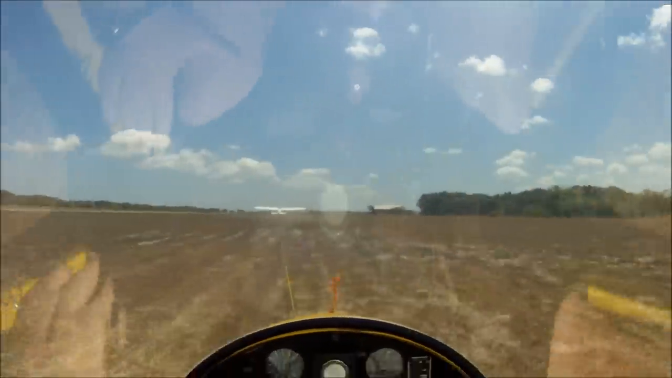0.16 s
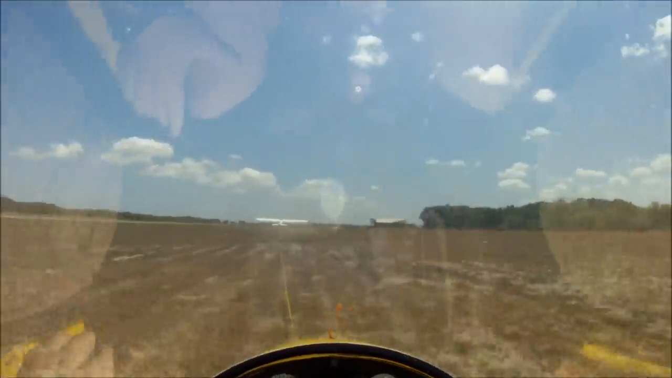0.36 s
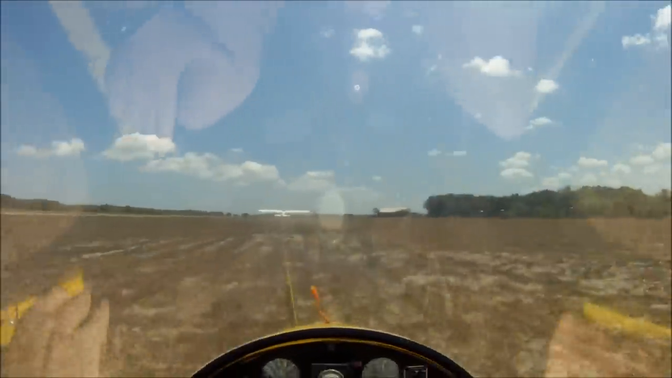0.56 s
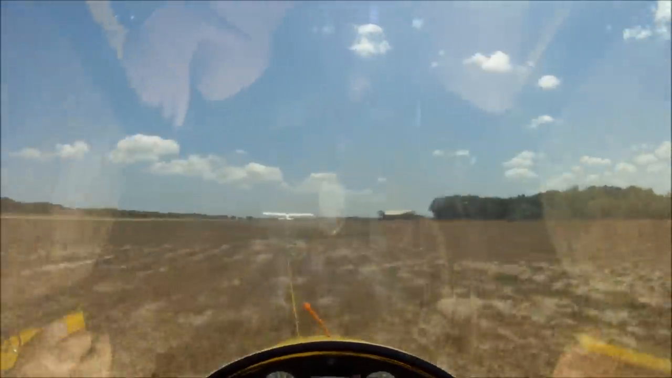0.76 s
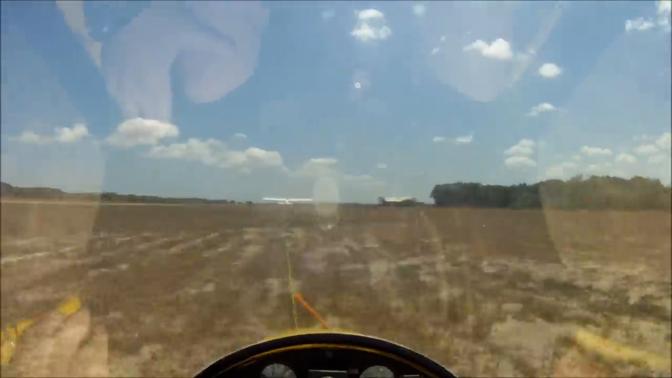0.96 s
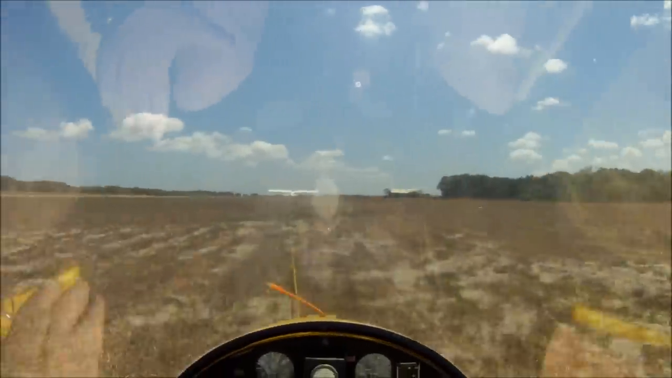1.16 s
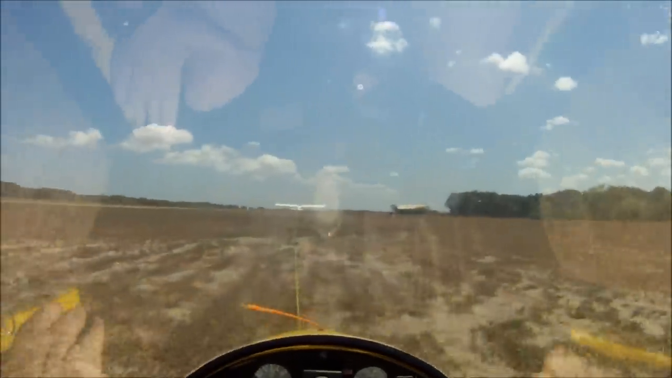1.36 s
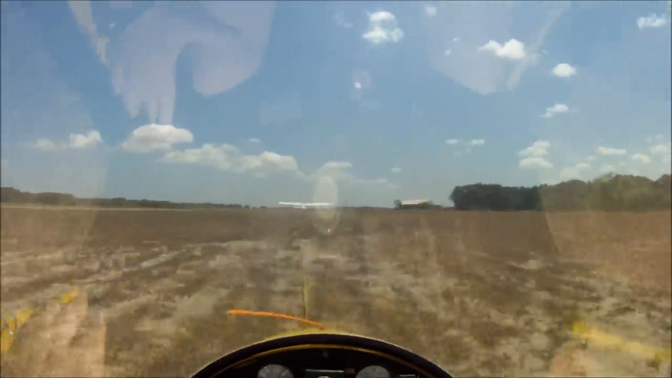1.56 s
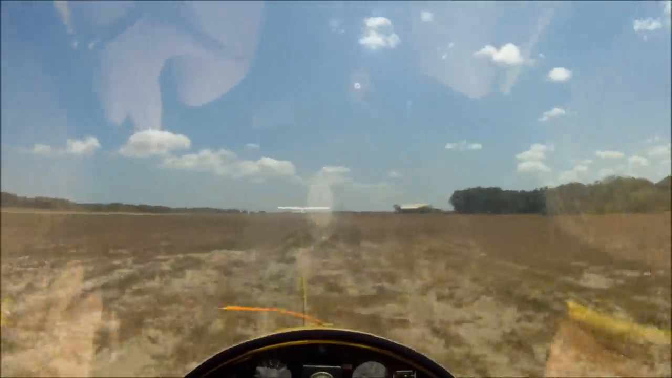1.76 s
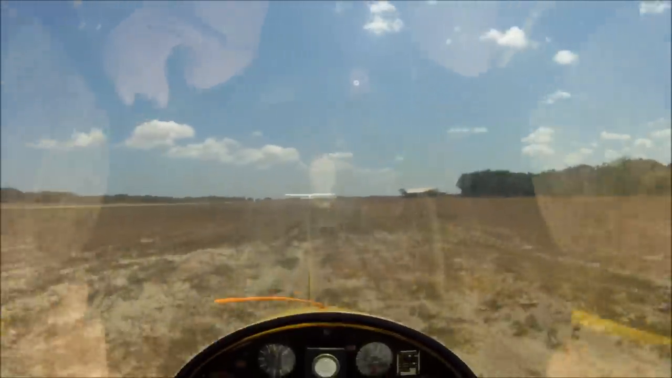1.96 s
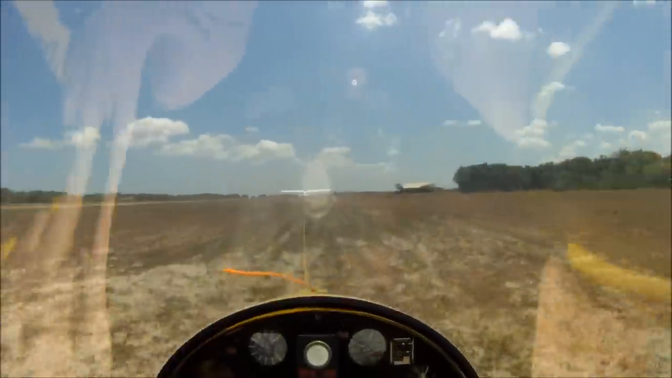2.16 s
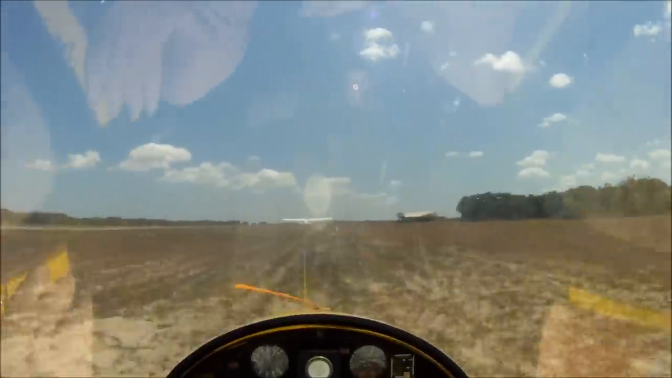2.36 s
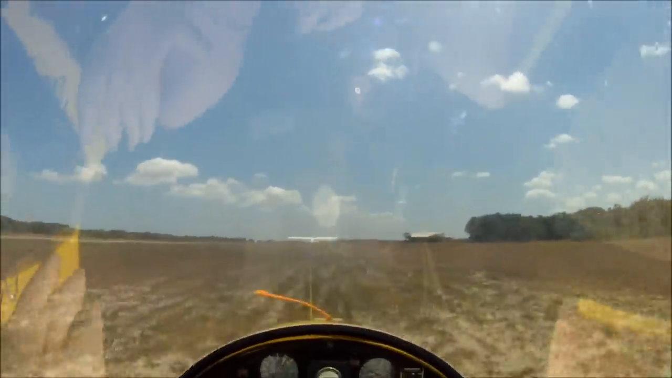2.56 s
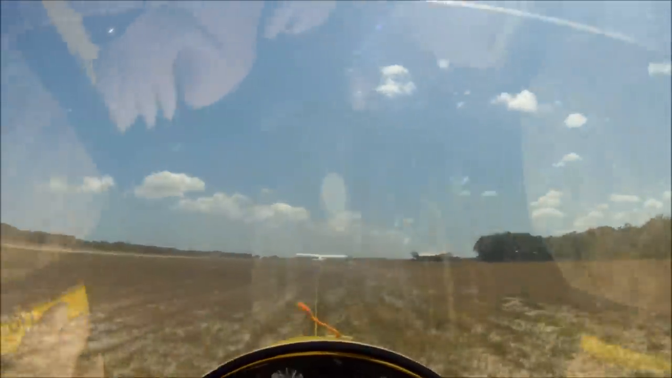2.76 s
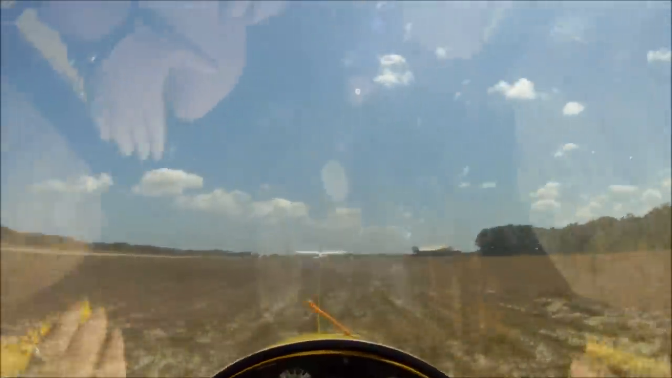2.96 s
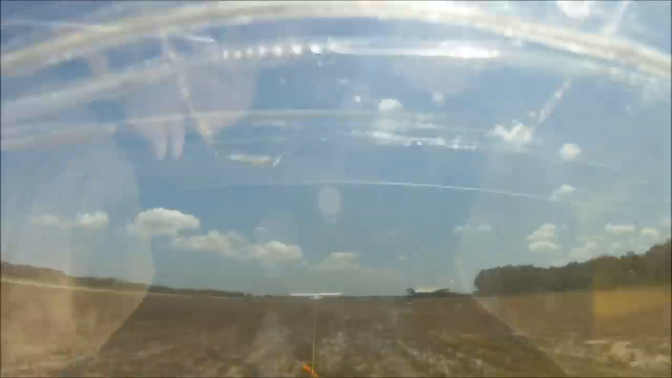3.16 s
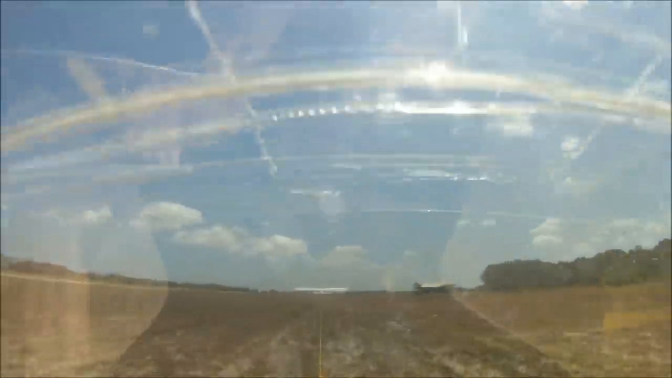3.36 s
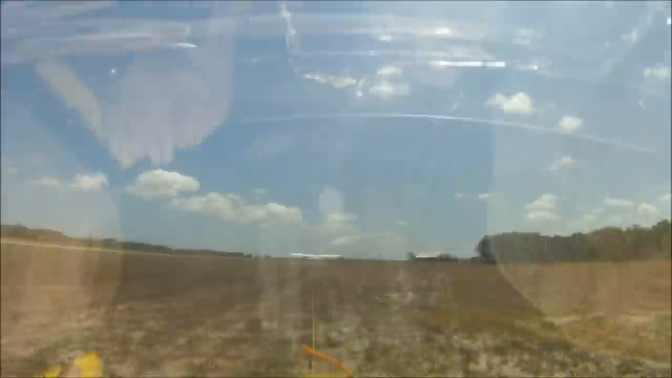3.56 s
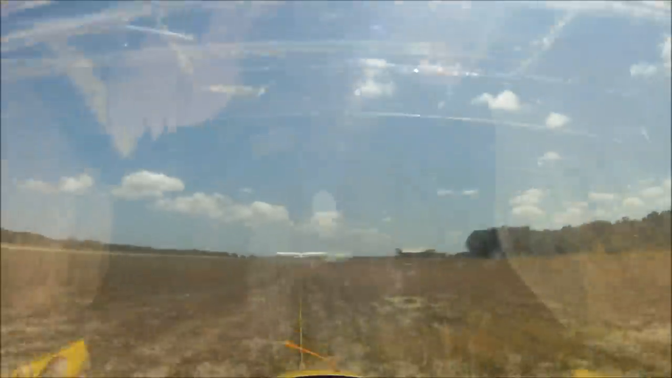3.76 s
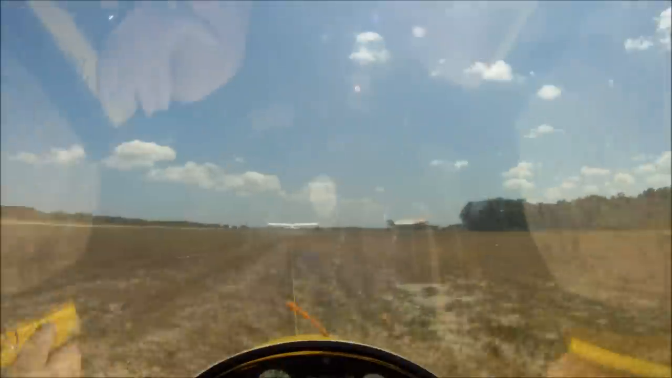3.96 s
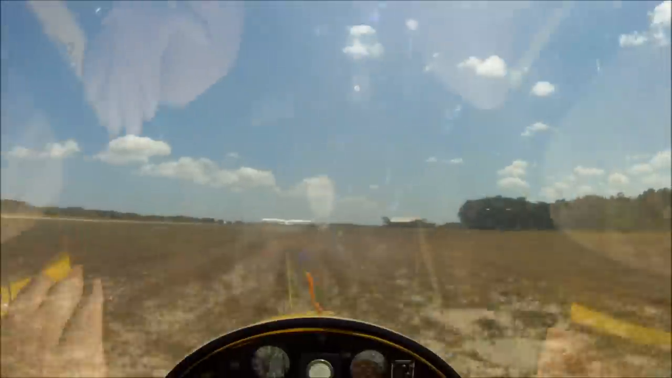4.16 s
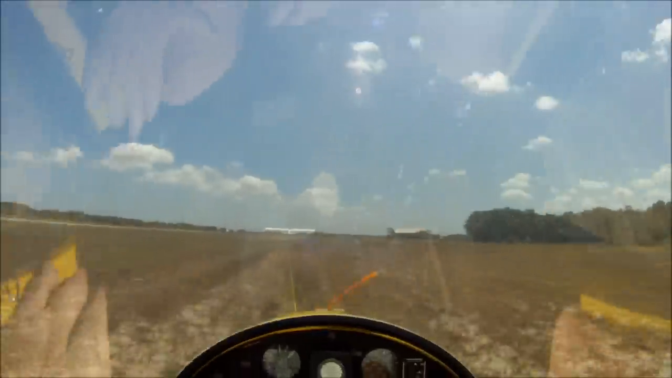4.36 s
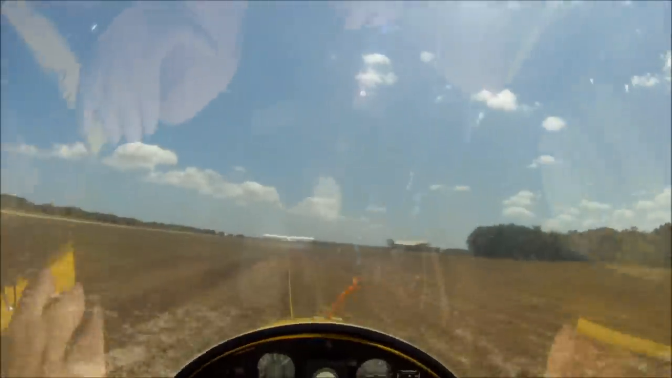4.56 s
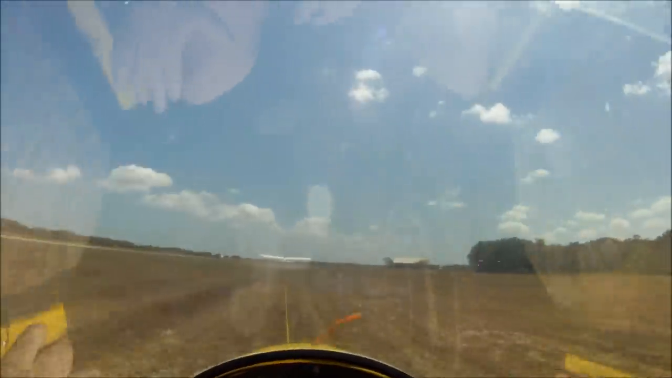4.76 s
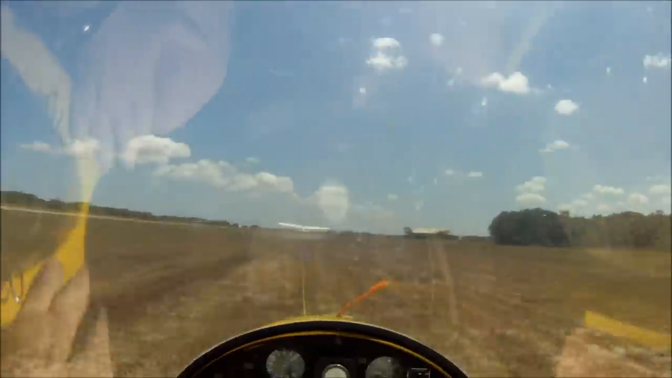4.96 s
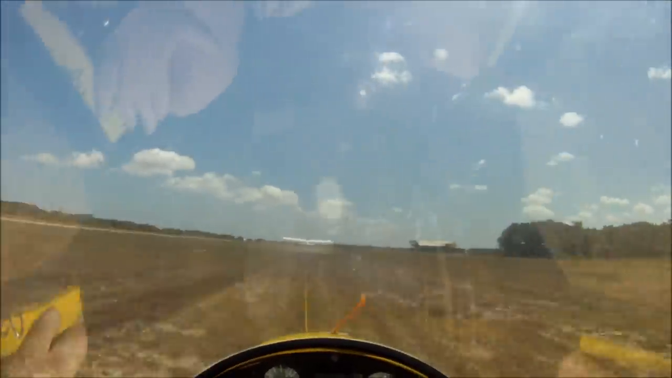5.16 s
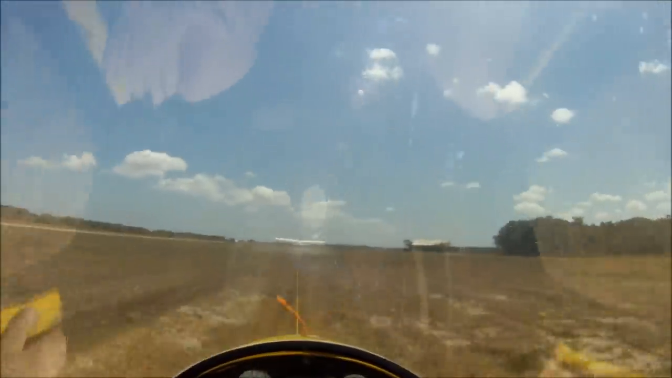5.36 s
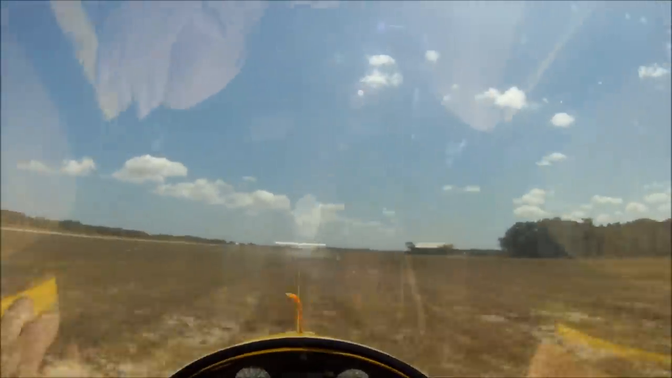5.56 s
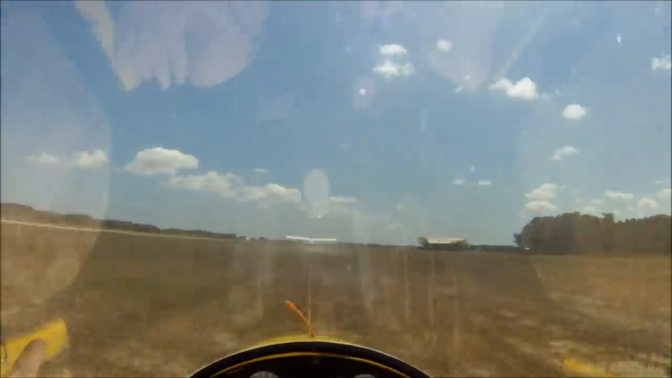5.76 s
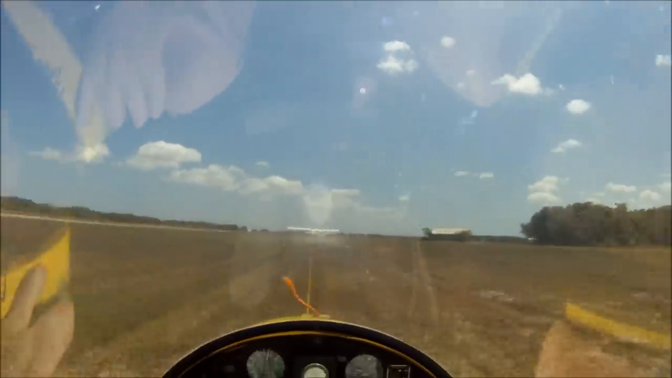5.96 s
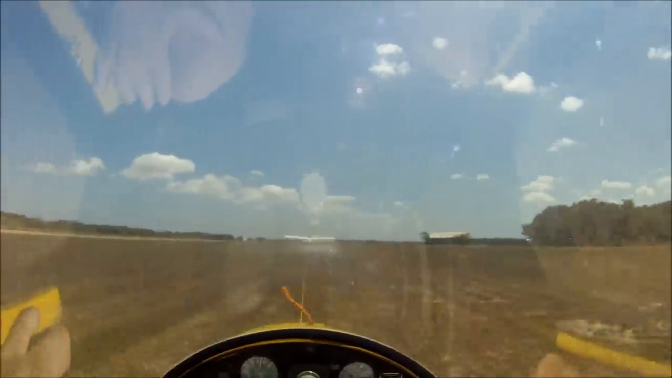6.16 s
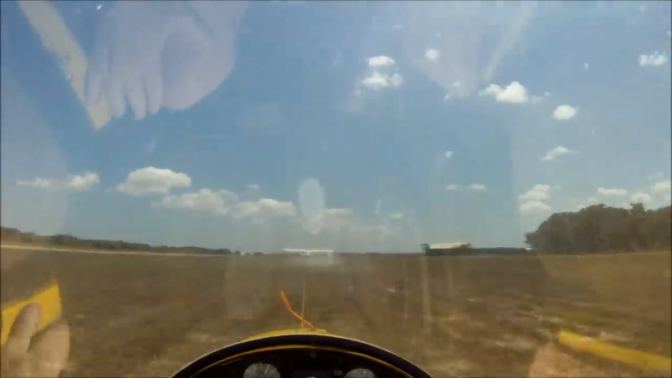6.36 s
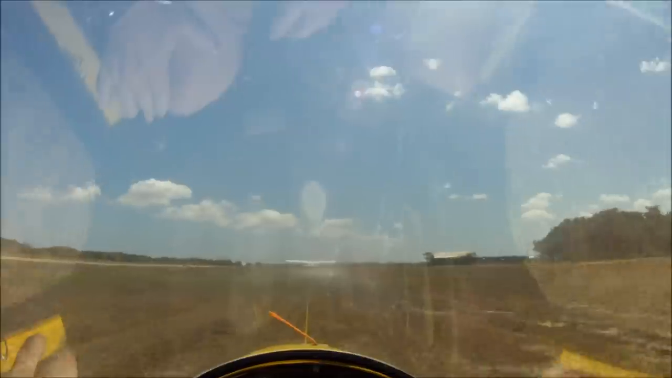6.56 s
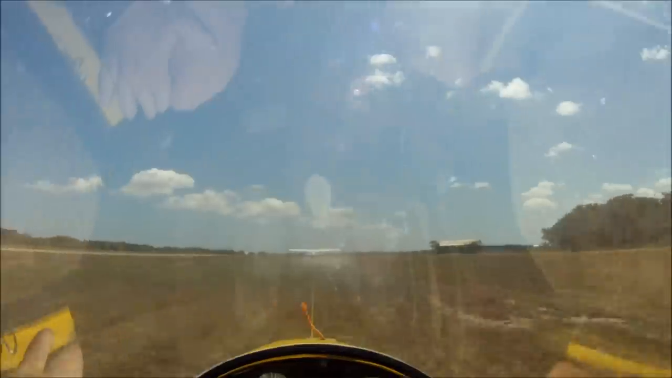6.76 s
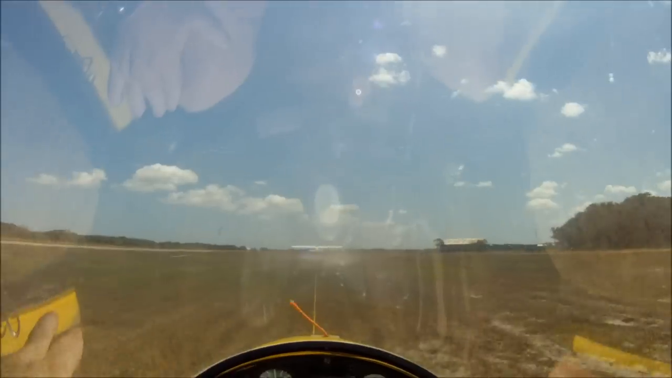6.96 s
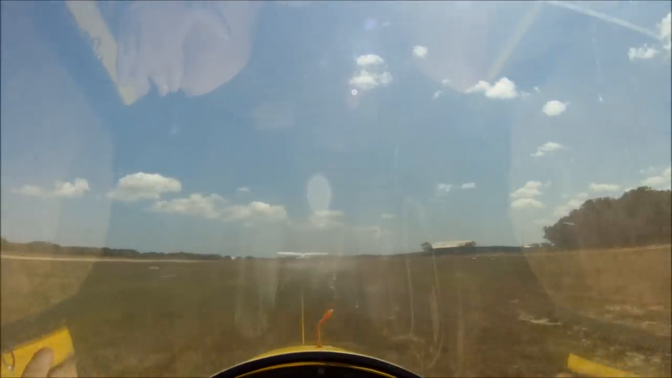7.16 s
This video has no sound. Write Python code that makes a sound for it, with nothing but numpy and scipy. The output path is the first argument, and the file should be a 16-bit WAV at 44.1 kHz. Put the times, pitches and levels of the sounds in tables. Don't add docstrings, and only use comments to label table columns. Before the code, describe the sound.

A glider under tow rolls over rough grass, heard in mono by a small camera fixed in the cockpit. From the first instant there is a low, lumpy wheel boom, hollow hull resonance and gritty shell rattle, with a loose fitting ticking and bouncing irregularly. At 0.24 s a hard knock cracks against the camera case, with a low push, and the level ducks briefly. Slaps and shakes continue, denser around 1.8-2.5 s, with soft to firm wheel drops at 1.6 and 2.4. A sharp slap at 2.95 leads into rough jolting until 3.5. At 3.9 a second loud knock lands, followed at 3.97 by the deepest thump and another heavy one at 4.3. A firm drop and booming jolt come at 4.75. Then spaced slaps, ruts and clicks, with fuller boom at 6.7, still rolling when it stops at 7.3. Treble is coarse and gritty.

```python
import sys
import numpy as np
from scipy import signal
from scipy.fft import rfft, irfft, next_fast_len
from scipy.io import wavfile
from scipy.ndimage import uniform_filter1d

SR = 44100
rng = np.random.default_rng(int(sys.argv[2]) if len(sys.argv) > 2 else 0)


def amplitude_ratio(level_db):
    exponent = np.asarray(level_db, float) / 20
    return 10 ** exponent


def store_wav(level_fs):
    pcm = np.round(np.clip(np.atleast_2d(level_fs), -1, 1) * 32767)
    wavfile.write(sys.argv[1], SR, pcm.T.astype(np.int16))


N = 321822
TIME = np.arange(N) / SR

# (time [s], roughness [dB], wheel load [dB])
GROUND = [(0.0, -47.5, -35), (0.89, -45.5, -31.5), (1.12, -42, -31.5), (1.5, -43, -34.5), (1.97, -37, -28),
          (2.44, -39, -31.5), (2.9, -43, -29), (3.33, -29.5, -36.5), (3.7, -42.5, -29.5), (4.0, -41, -31),
          (4.21, -34.5, -30), (4.41, -39, -28.5), (5.02, -44.5, -33), (6.22, -42.5, -29),
          (6.59, -41.5, -31.5), (6.75, -35.5, -27.5), (6.93, -45.5, -32.5), (7.3, -39, -25.5)]
# (middle [s], length [s], boom drop [dB], rattle drop [dB])
SKIPS = [
    (0.852, 0.082, 3.5, 4.5),
    (2.923, 0.09, 5, -1),
    (3.717, 0.033, 5, 1),
    (4.003, 0.039, 6, 24),
    (4.234, 0.071, 5, 4),
    (4.7, 0.065, 12, 3),
    (6.026, 0.048, 13, 0),
    (6.47, 0.041, 8, -2),
]
# (middle [s], length [s], thud [dB])
PRESSES = [(.33, .08, -28), (1.265, 0.15, -41), (1.624, .06, -32), (2.066, .06, -33), (2.327, .06, -31),
           (3.086, 0.11, -31), (3.33, 0.24, -27), (3.663, 0.09, -34), (3.78, 0.038, -43),
           (3.963, 0.046, -22), (4.43, 0.11, -27.5), (4.635, .08, -29), (4.884, 0.063, -31.5),
           (5.14, .1, -32), (5.513, 0.12, -35), (5.835, 0.079, -27.5), (6.19, 0.046, -30),
           (6.593, 0.064, -34), (6.853, .15, -40), (7.22, .1, -42)]
# (middle [s], length [s], lower modes [dB], upper modes [dB])
BOOMS = [(.01, 0.098, -40, -42), (0.96, .06, -41, -64), (1.59, 0.039, -36.5, -54), (1.99, 0.076, -42, -54),
         (2.297, 0.034, -50, -40), (2.446, 0.12, -35, -48), (3.22, 0.05, -34, -46), (3.3, 0.13, -30, -34),
         (3.487, 0.037, -32.5, -37), (3.793, 0.028, -40, -31.5), (3.954, 0.044, -29, -34),
         (4.122, 0.069, -40, -38), (4.427, 0.073, -45, -44), (4.655, 0.049, -51, -42),
         (4.751, 0.058, -23.5, -29), (5.004, 0.076, -54, -35), (5.687, 0.097, -40, -40),
         (6.085, 0.055, -47, -32.5), (6.334, 0.09, -46, -32), (6.59, 0.067, -39, -45),
         (6.671, 0.086, -27.5, -34.5), (6.945, 0.24, -35.5, -47)]
# (frequency [Hz], width [Hz], level [dB])
THUD_MODES = [(20.3, 15.9, 1.5), (42, 39.4, 0.5), (66.7, 46.5, -4)]
# (frequency [Hz], width [Hz], level [dB])
KEEL_MODES = [(82.3, 21.6, 0), (133.9, 13.5, -0.5)]
# (frequency [Hz], width [Hz], level [dB])
HULL_MODES = [(172.4, 16.4, 1), (196.2, 13.2, 2), (226.6, 18.3, -1.5), (298.3, 8.6, -10)]
# (frequency [Hz], width [Hz], level rolling [dB], level jolted [dB])
SHELL_MODES = [(312.5, 81, -8, -1.5), (472, 55, -6, 0.5), (614, 47, -8, 1), (833, 139, -10.5, -6),
               (1218, 196, -9.5, -2.5), (1654, 180, -8.5, -6), (2109, 218, -1, 6), (2307, 164, 1, 8),
               (2429, 215, -4, 3), (2980, 300, -21, -1.5), (3203, 94, -12.5, 2), (3745, 280, -15, 0),
               (4270, 116, -20.5, -55), (4820, 530, -21.5, -12.5), (6000, 1760, -21, -47),
               (5660, 370, -41, -12)]
# (time [s], peak [dB], high modes [dB], low modes [dB])
SLAPS = [(0.0406, -31, -19, -4.5), (0.368, -27, -26, -16), (0.781, -29, -22, -14),
         (1.5515, -28.5, -15, -18), (1.7614, -22.5, -8, -8.5), (1.8247, -27, -9, -8),
         (1.954, -19, -12.5, -7), (1.9933, -24, -7, -15), (2.2792, -42, -18, -23),
         (2.3303, -19.5, -32, -31), (2.4734, -25, -18, -17), (2.535, -30.5, -16, -3.5),
         (2.796, -33.5, -22, -4), (2.9522, -14, -12.5, -13.5), (3.058, -25.5, -14.5, -9),
         (3.1318, -34.5, -2, -32), (3.1907, -18.5, -9.5, -10.5), (3.3088, -17, -11.5, -13),
         (3.3747, -20, -5, -17), (3.707, -28, -5, -10), (3.9505, -30, -0.5, -6), (4.5285, -27.5, -28, -16),
         (4.6208, -26.5, -15, -6.5), (4.7946, -25.5, -15, -4.5), (5.436, -27, -36, -10),
         (5.971, -23, -12, -13.5), (6.052, -31.5, -12, -7), (6.3823, -24.5, -17, -15),
         (6.539, -28, -20, -32), (6.6796, -21, -14.5, -9.5)]
# (time [s], peak [dB], t60 [s])
SHAKES = [(0.276, -34.5, 0.41), (0.566, -32.5, 0.32), (0.6217, -30, 0.17), (1.008, -36, 0.29),
          (1.1209, -30.5, 0.15), (1.6107, -33, 0.28), (1.8996, -30, .2), (2.179, -26.5, 0.17),
          (2.361, -27, 0.37), (2.398, -27.5, 0.21), (2.4234, -27.5, 0.24), (2.69, -32, 0.54),
          (3.439, -18.5, 0.18), (3.5945, -41, 0.18), (3.915, -20, 0.15), (4.0417, -32.5, 0.21),
          (4.0787, -18.5, 0.19), (4.378, -24.5, 0.33), (4.4175, -26, 0.35), (4.575, -24, 0.15),
          (4.749, -24.5, 0.26), (4.8355, -33, 0.48), (5.0285, -26, 0.053), (5.2698, -24.5, 0.23),
          (5.53, -32.5, 0.53), (5.6, -34, 0.42), (6.487, -23.5, 0.27), (6.733, -34, 0.99),
          (7.1208, -29, 0.1), (5.691, -26, 0.052)]
# (time [s], peak [dB])
TICKS = [(.042, -28), (.11, -28), (.3711, -35), (.4275, -32), (1.12, -27.5), (1.1878, -24.5), (1.5335, -30),
         (1.6033, -30.5), (1.6363, -34), (1.757, -23), (1.9027, -29.5), (1.9989, -30), (2.1137, -25.5),
         (2.209, -28.5), (2.4484, -28), (3.1269, -27), (3.1932, -29), (3.5609, -29), (3.6123, -25.5),
         (4.1389, -25.5), (4.6447, -27), (4.7764, -25.5), (4.8567, -22), (4.9181, -27.5), (5.2209, -29.5),
         (5.6026, -28.5), (5.8769, -26.5), (6.0101, -33), (6.4172, -28.5), (7.1745, -33.5)]
# (time [s], peak [dB])
MORE_TICKS = [(3.9738, -36), (0.492, -32), (.6231, -39), (5.5197, -32), (0.7815, -36), (.8426, -38.5),
              (0.941, -33), (5.747, -39), (1.084, -37), (1.294, -33), (1.3698, -30.5), (1.422, -35.5),
              (1.8154, -46), (0.2966, -26), (2.278, -32), (2.3591, -27), (2.407, -31), (2.702, -31),
              (2.9198, -34), (3.4037, -29), (3.7724, -34.5), (3.8123, -36), (4.0697, -32), (4.3788, -30),
              (4.4207, -31), (4.4834, -30), (5.2663, -32), (5.3002, -37), (5.928, -29.5), (5.9872, -38)]
# (frequency [Hz], width [Hz], level [dB])
FITTING_MODES = [(2000, 650, -10), (3500, 1100, 0.5), (3610, 200, 5.5), (4570, 180, -4), (5300, 160, 2.5)]
# (time [s], peak [dB], frequency [Hz], t60 [s])
DROPS = [
    (1.59, -24, 42, 0.19),
    (2.39, -18.5, 39.7, 0.13),
    (3.188, -17, 61, 0.081),
    (3.969, -7, 45, 0.11),
    (4.029, -20, 45, 0.036),
    (4.308, -11.5, 42, 0.12),
    (4.744, -17.5, 48, 0.11),
    (6.19, -43, 40, 0.042),
]
# (time [s], crack [dB], push [dB], push frequency [Hz], t60 [s])
KNOCKS = [
    (0.2411, 11, -1.5, 162, 0.022),
    (0.2445, -36, 1, 39.7, 0.063),
    (0.257, -26, -23, 100, 0.008),
    (3.895, 12.5, 6, 146, 0.022),
    (3.9044, 1, -20, 120, 0.0052),
    (3.909, -26, 2.5, 89, 0.049),
    (3.968, -13, -15, 120, 0.0067),
]
# (frequency [Hz], width [Hz], level [dB])
CASE_MODES = [(770, 170, -7.5), (1270, 200, -0.5), (1764, 95, 4), (2054, 100, 5.5), (2630, 96, 3.5),
              (3080, 170, -12.5), (3300, 90, -12), (3594, 98, -2), (4280, 240, -12.5), (4840, 120, -13)]

THUD_DB, KEEL_DB, HULL_DB, RATTLE_DB = -2, -9.5, -6.5, 2
HULL_GROWS_DB_PER_S = 0.09
LUMPS_DB, LUMP_S = (2.5, 4, 1.5), 0.046
SLAP_T60_S, SHAKE_HIGH_DB, SHAKE_LOW_DB = 0.13, -13, -11.5
SHAKE_SLAP = 0.94
CHATTER_PER_S, CHATTER_DB = 6, -46
STRIKE_DB = 18.5
HOLD_HZ = 12000


def evened(x):
    return x / np.sqrt(np.mean(x ** 2) + 1e-20)


def steadied(x, smooth_s):
    return x / np.sqrt(abs(uniform_filter1d(x ** 2, int(smooth_s * SR))) + 0.15)


def add(mix, start_s, sound):
    part = mix[round(start_s * SR):][:len(sound)]
    part += sound[:len(part)]


def ring(x, modes):
    size = next_fast_len(len(x) + 8192)
    hz = np.fft.rfftfreq(size, 1 / SR)
    shape = 0
    for k, (mode_hz, width_hz, db) in enumerate(modes):
        damping = 1j * hz * width_hz
        shape = shape + (-1) ** k * amplitude_ratio(db) * damping / (mode_hz ** 2 - hz ** 2 + damping)
    shape = shape / np.sqrt(np.mean(abs(shape) ** 2))
    return irfft(rfft(x, size) * shape, size)[:len(x)]


def fade(t60_s, rise_s):
    t = np.arange(int(t60_s * SR) + 1) / SR
    return (1 - np.exp(-t / rise_s)) * amplitude_ratio(-60 * t / t60_s)


def hump(middle_s, length_s):
    return np.exp(-((TIME - middle_s) / (0.5 * length_s)) ** 2)


def grit(flicker_db, smooth_s):
    flicker = evened(uniform_filter1d(rng.standard_normal(N), int(smooth_s * SR)))
    return evened(rng.standard_normal(N) * amplitude_ratio(flicker_db * flicker))


def lumps(swell_db):
    width = int(LUMP_S * SR)
    swell = uniform_filter1d(uniform_filter1d(rng.standard_normal(N), width), width)
    return amplitude_ratio(swell_db * evened(swell))


def boom():
    s, _, load_db = np.transpose(GROUND)
    skip_db = sum(db * hump(t, w) for t, w, db, _ in SKIPS)
    load = amplitude_ratio(np.interp(TIME, s, load_db) - skip_db)
    thud_lumps, keel_lumps, hull_lumps = [lumps(db) for db in LUMPS_DB]
    thud = load * thud_lumps * amplitude_ratio(THUD_DB)
    thud += sum(amplitude_ratio(db) * hump(t, w) for t, w, db in PRESSES)
    keel = load * keel_lumps * amplitude_ratio(KEEL_DB)
    keel += sum(amplitude_ratio(db) * hump(t, w) for t, w, db, _ in BOOMS)
    hull = load * hull_lumps * amplitude_ratio(HULL_DB + HULL_GROWS_DB_PER_S * TIME)
    hull += sum(amplitude_ratio(db) * hump(t, w) for t, w, _, db in BOOMS)
    mix = np.zeros(N)
    for level, modes in ((thud, THUD_MODES), (keel, KEEL_MODES), (hull, HULL_MODES)):
        mix += level * steadied(ring(rng.standard_normal(N), modes), smooth_s=0.1)
    return mix


def rattle():
    s, rough_db, _ = np.transpose(GROUND)
    skip_db = sum(db * hump(t, w) for t, w, _, db in SKIPS)
    level = amplitude_ratio(np.interp(TIME, s, rough_db) - skip_db + RATTLE_DB)
    modes = [(hz, width, db) for hz, width, db, _ in SHELL_MODES]
    return ring(level * grit(flicker_db=2, smooth_s=0.016), modes)


def jolts():
    low, middle, high = np.zeros((3, N))
    bumps = [(*row, SLAP_T60_S, 1) for row in SLAPS]
    bumps += [(s, db, SHAKE_HIGH_DB, SHAKE_LOW_DB, t60, SHAKE_SLAP) for s, db, t60 in SHAKES]
    for s, db, high_db, low_db, t60, sharp in bumps:
        start = s - 0.0012
        for drive, share_db, slap in ((low, low_db + 5, 0.8), (middle, 0, 0.8), (high, high_db + 5, 0.9)):
            add(drive, start, amplitude_ratio(db + share_db - 3) * fade(t60, rise_s=0.0057))
            add(drive, start, sharp * slap * amplitude_ratio(db + share_db) * fade(0.016, rise_s=0.0005))
    shake = grit(flicker_db=1.5, smooth_s=0.004)
    modes = [(hz, width, db) for hz, width, _, db in SHELL_MODES]
    return ring(low * shake, modes[:5]) + ring(middle * shake, modes[5:9]) + ring(high * shake, modes[9:])


def ticks():
    chatter = rng.random((int(CHATTER_PER_S * N / SR), 2)) * (N / SR, 8) + (0, CHATTER_DB)
    hits = [*TICKS, *MORE_TICKS, *chatter]
    strikes = np.zeros(N)
    gaps_s = np.cumsum(0.003 + 0.006 * rng.random((len(hits), 3)), axis=1)
    click_s = 0.006
    signs = rng.choice([-1., 1.], (len(hits), 1 + int(click_s * SR)))
    clicks = fade(click_s, rise_s=0.0001) * signs
    clicks[:, 1] += 5
    for (s, db), later_s, click in zip(hits, gaps_s, clicks):
        add(strikes, s, amplitude_ratio(db - 2) * click)
        for gap_s, loss_db in zip(later_s, (7, 11, 16)):
            bounce_db = db - loss_db - 11.5 * rng.random() + 5
            add(strikes, s + gap_s, amplitude_ratio(bounce_db) * click)
    return ring(strikes, FITTING_MODES)


def swing(db, hz, t60_s):
    shape = fade(t60_s, rise_s=0.13 / hz)
    return amplitude_ratio(db + 4.5) * shape * np.sin(2 * np.pi * hz * np.arange(len(shape)) / SR)


def knocks():
    push, crack = np.zeros(N), np.zeros(N)
    for s, crack_db, push_db, hz, t60 in KNOCKS:
        add(push, s, -swing(push_db, hz, 1.34 * t60))
        add(crack, s, amplitude_ratio(crack_db) * fade(min(t60, 0.018), rise_s=0.0002))
    scrape = crack * rng.choice([-1., 1.], N)
    for s, crack_db, *_ in KNOCKS:
        add(scrape, s, -amplitude_ratio(crack_db + STRIKE_DB) * np.hanning(5))
    return push + ring(amplitude_ratio(-8.5) * scrape, CASE_MODES)


def wheel_drops():
    low = np.zeros(N)
    for s, db, hz, t60 in DROPS:
        add(low, s, swing(db, hz, t60))
    return low


def scene():
    return (boom() + rattle() + jolts() + ticks() + knocks() + wheel_drops())[None]


def top_cut(x):
    return signal.sosfilt(signal.butter(12, 16470, fs=SR, output="sos"), x)


def low_pass(x, taps, cutoff_hz, beta):
    return signal.oaconvolve(x, signal.firwin(taps, cutoff_hz, window=("kaiser", beta), fs=SR), "same")


def record(dry):
    peak_db = 20 * np.log10(abs(dry[0]) + 1e-9)
    fall_db = TIME * 182.0
    over_db = np.maximum(np.maximum.accumulate(peak_db + fall_db) - fall_db + 10, 0)
    late_db = np.concatenate([np.zeros(230), over_db])[:N]
    x = dry[0] / amplitude_ratio(0.63 * uniform_filter1d(late_db, 60))
    x = np.clip(low_pass(x, 61, 5700, 3.5), -1, 1)
    x = low_pass(x, 63, 6200, 6)
    mirrored = x * (1 + 2 * np.cos(2 * np.pi * HOLD_HZ * TIME))
    size = next_fast_len(N)
    hold = np.sinc(np.fft.rfftfreq(size, 1 / SR) / HOLD_HZ)
    held = irfft(rfft(mirrored, size) * hold, size)[:N]
    held = low_pass(held, 301, 15450, 6)
    return top_cut(np.clip(held, -1, 1)[None])


dry = scene()
out = record(dry)
store_wav(out)
```